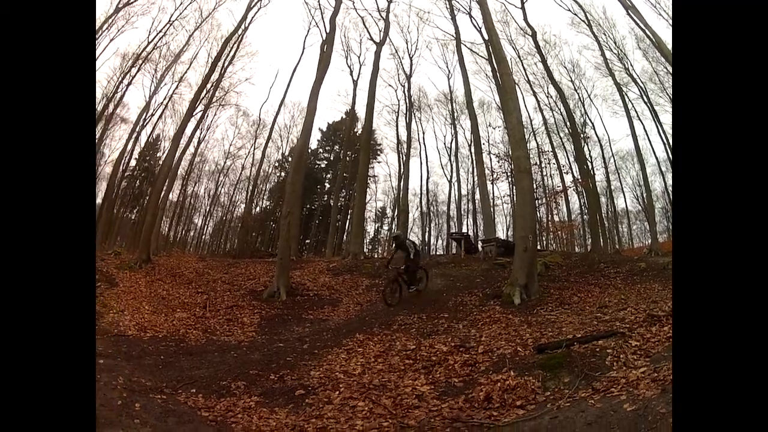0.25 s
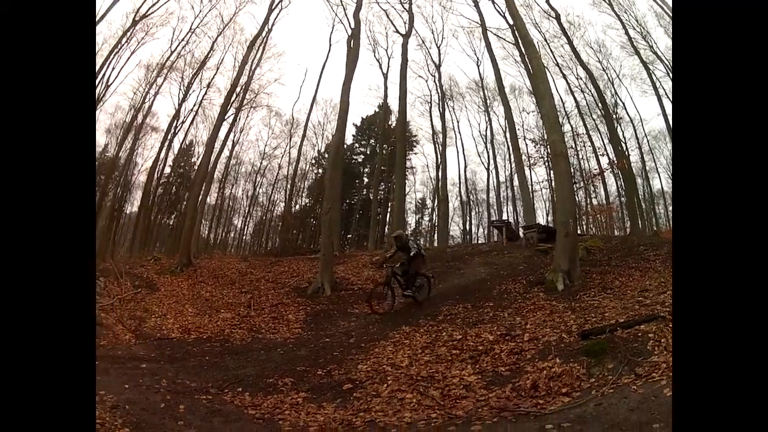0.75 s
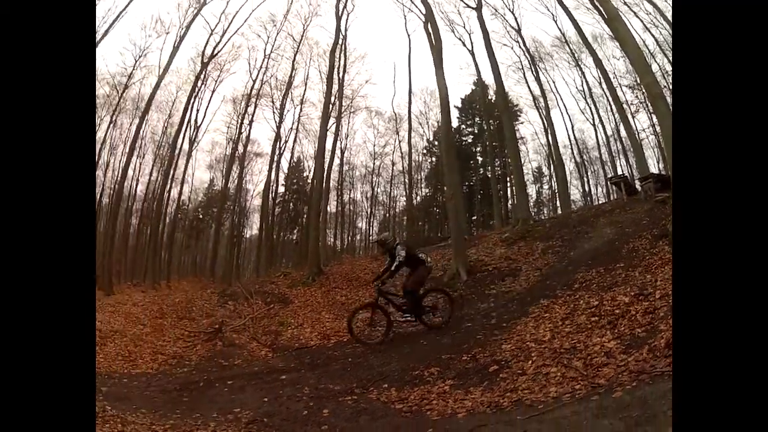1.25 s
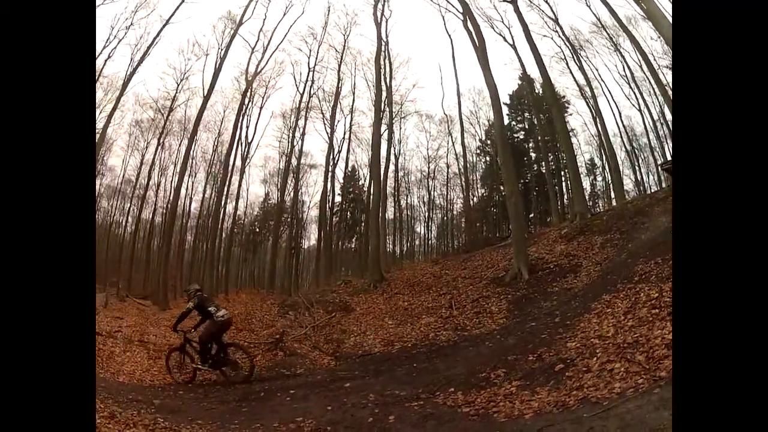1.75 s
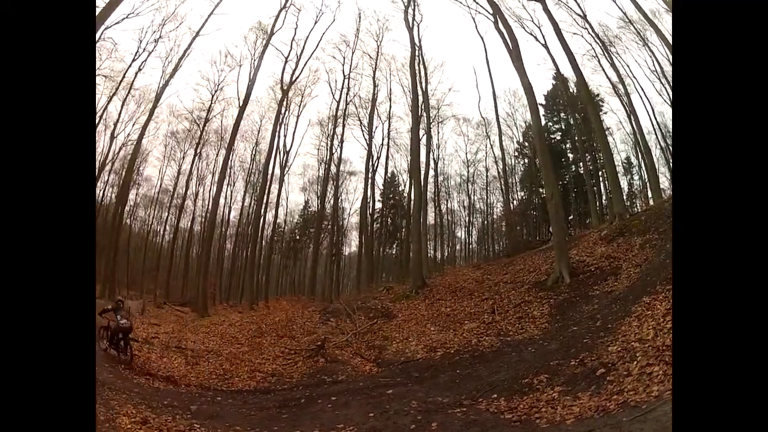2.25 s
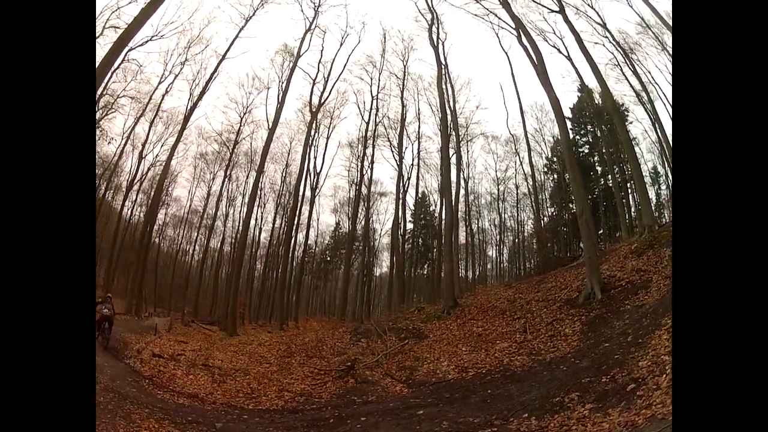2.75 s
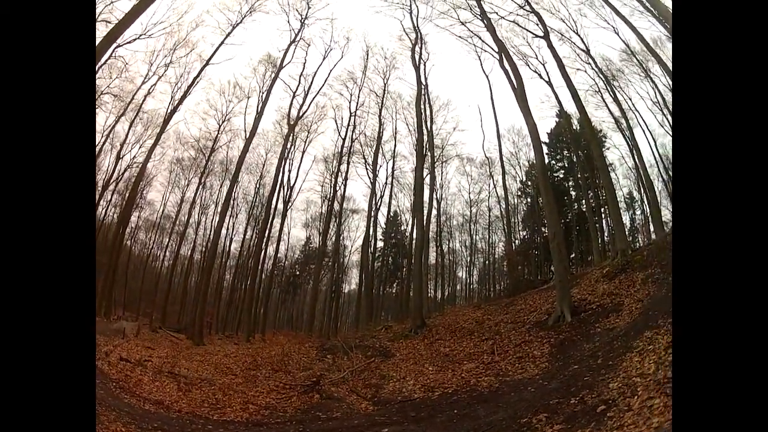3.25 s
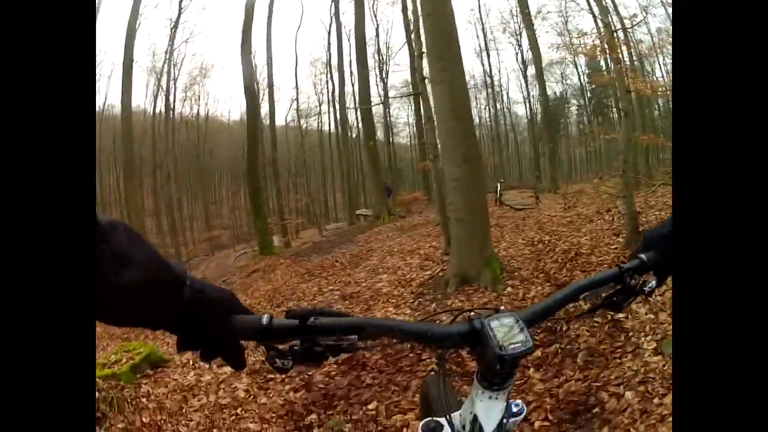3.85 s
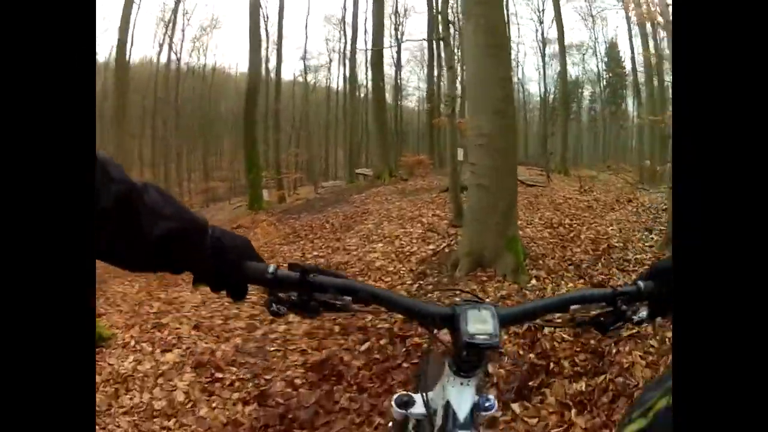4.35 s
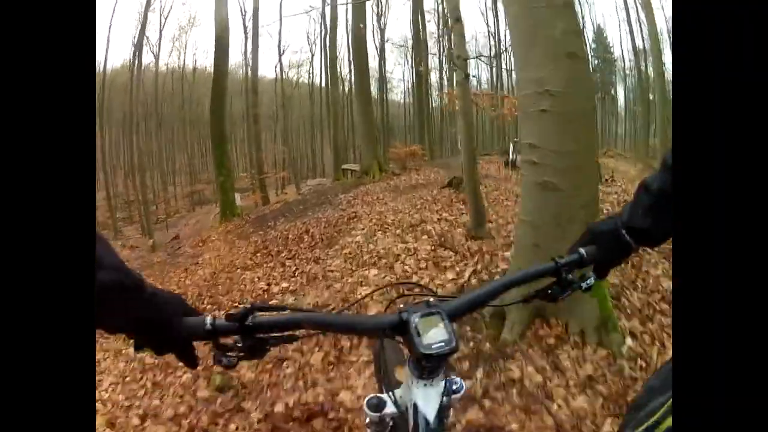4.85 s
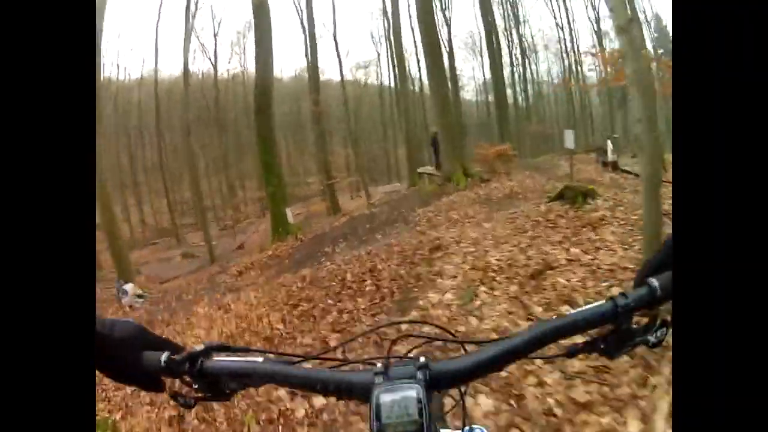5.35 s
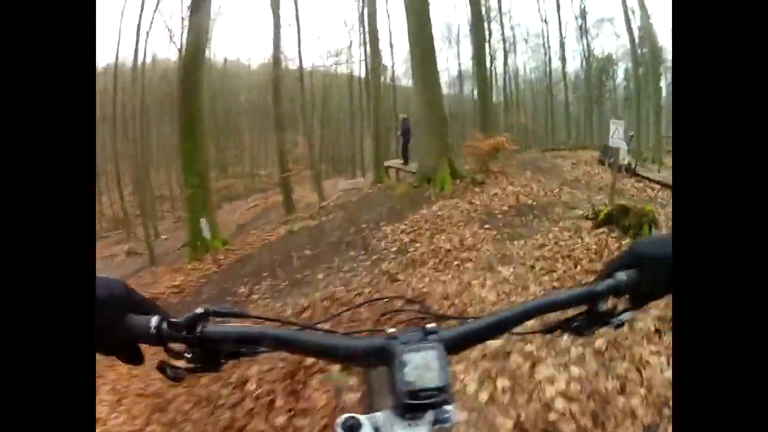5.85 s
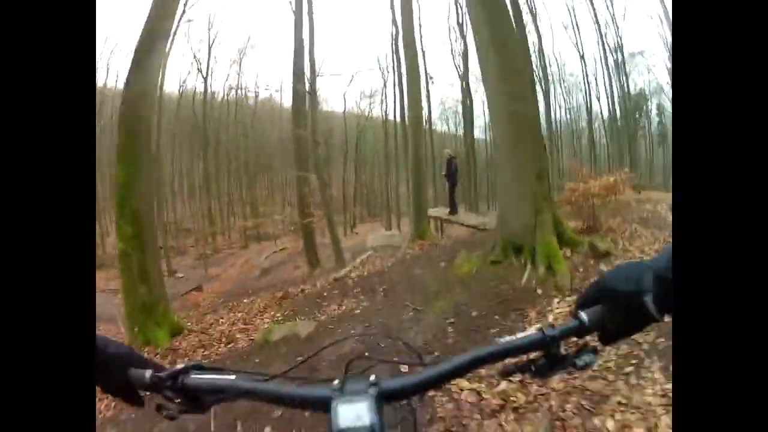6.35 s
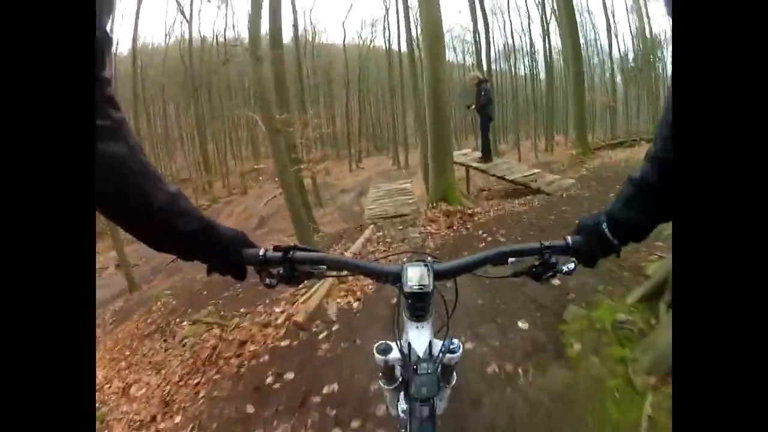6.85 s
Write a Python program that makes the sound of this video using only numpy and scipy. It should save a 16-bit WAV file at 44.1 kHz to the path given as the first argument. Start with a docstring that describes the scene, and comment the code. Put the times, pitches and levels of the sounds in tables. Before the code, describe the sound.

Bicycle tyres thud on soil and crunch dry leaves, first passing by, then close up with rattling bumps, snaps and buffeting air.

```python
"""A leafy forest trail: a mountain bike heard by an action camera in a closed housing. It rolls past, the
first second at a third of its speed; after a short gap we ride along at the rider's chest, speeding up.
Air and frame rumble, tyre knobs thud on soil and ring the housing, and dry leaves crackle. Bumps knock,
twigs snap, the drivetrain buzzes and a brake squeals once, over a far hum. The camera holds each sample
at a low rate, so the sound returns mirrored around that rate."""
import sys
import numpy as np
from scipy import signal
from scipy.fft import rfft, irfft, next_fast_len
from scipy.io import wavfile
from scipy.ndimage import uniform_filter1d, map_coordinates

SR = 44100
rng = np.random.default_rng(int(sys.argv[2]) if len(sys.argv) > 2 else 0)


def digitize_waveform(pressure):
    """Quantize a signal to 16-bit integers and store it at the path in sys.argv[1].

    Rows of a 2-D input are taken as channels; values are limited to [-1, 1].
    """
    field = np.atleast_2d(pressure).T
    bounded = np.clip(field, -1, 1)
    quanta = np.round(bounded * 32767).astype(np.int16)
    wavfile.write(sys.argv[1], SR, quanta)


N = 312933
TIME = np.arange(N) / SR

# Faders for the slow-motion pass: (time [s], rumble [dB], knobs [dB], leaves [dB])
SLOW_FADERS = [(0, -29.5, -69, -70), (.076, -48.5, -54, -66), (.083, -30, -45.5, -55.5),
               (.3, -48, -35.5, -45.5), (.5, -32.5, -38, -50.5), (1, -38.5, -44, -54)]
# Faders for the pass, then for the chest ride: (time [s], rumble [dB], knobs [dB], leaves [dB])
RIDE_FADERS = [
    [(1.0, -36.5, -46.5, -51.5), (1.15, -41, -40, -51.5), (1.36, -54, -38, -45.5), (1.7, -46, -44.5, -54),
     (2.07, -55, -38, -49.5), (2.25, -53, -44.5, -56.5), (2.46, -54.5, -50.5, -59.5),
     (3.0, -60, -49.5, -63.5), (3.52, -59, -56.5, -66.5)],
    [(3.56, -50, -58.5, -64.5), (4.03, -51.5, -49, -49), (4.5, -50, -40.5, -42), (5.05, -45, -44, -44),
     (5.5, -34.5, -39, -39.5), (5.8, -30.5, -45, -44.5), (6.1, -32, -43.5, -45), (6.38, -29, -37, -42.5),
     (6.5, -33, -48.5, -50), (6.7, -32, -42, -51), (7.1, -27.5, -42, -48)],
]
# Roots and leaf heaps: (start [s], length [s], knobs lift [dB], leaves lift [dB])
ROUGH_PATCHES = [(0.117, 0.024, 11.5, 5.5), (0.513, 0.035, 2.5, 6), (1.286, 0.071, 3.5, 3),
                 (1.424, 0.033, 2, 4), (1.575, .015, 2.5, 8), (1.651, 0.033, 9, 6.5),
                 (1.723, 0.0063, 2, 6.5), (1.794, 0.019, 3.5, 3.5), (2.56, 0.265, 5.5, -2.5),
                 (3.575, 0.1, 8.5, 6), (3.84, 0.054, 7, 4.5), (4.079, 0.083, 3, -0.5),
                 (4.635, 0.11, 1.5, -2.5), (5.115, 0.068, 7, 5.5), (5.262, 0.031, 3, 5),
                 (5.365, 0.077, 0.5, 2), (5.528, 0.1, -0.5, 2.5), (5.856, 0.12, 6.5, 6),
                 (6.197, 0.09, 3.5, 3), (6.705, 0.068, 3.5, 3), (6.858, 0.023, 7.5, 3.5),
                 (7.034, 0.005, -3.5, 2)]
def rolling(faders, housing, speed, thud_db, frame_db):
    """Tyres on the trail: the same jolts shake thud, housing and leaves, over the rumble."""
    rumble_db, knobs_db, leaves_db = curves(faders)
    lift_db = np.zeros(N)
    for start, length, knobs_lift_db, leaves_lift_db in ROUGH_PATCHES:
        patch = plateau(start, length, attack_s=0.0055, release_s=0.044)
        lift_db += knobs_lift_db * patch
        leaves_db += leaves_lift_db * patch
    swing_db = 0.26 * (knobs_db + 41.5)  # the thud swings wider than the knobs' fader
    tyre_gain = amp(knobs_db + thud_db + swing_db + 0.8 * lift_db)
    thud_gain = np.hypot(tyre_gain, amp(rumble_db + frame_db))  # the shaking frame adds weight
    rumble = amp(rumble_db) * air_rumble(speed)
    jolts = wobble(25 * speed)
    thud = thud_gain * tyre_thud(jolts, speed)
    ring = amp(knobs_db + lift_db) * housing_ring(housing, jolts, speed)
    leaves = amp(leaves_db) * leaf_crackle(jolts, speed)
    return rumble + thud + ring + leaves


# Rumble EQ at full speed: (frequency [Hz], relative level [dB])
RUMBLE_EQ = [(12, -41), (22, -9.5), (40, 2.5), (80, 0.5), (130, -1.5), (250, -13.5), (660, -120)]
def air_rumble(speed):
    """Buffeting air and frame: deep noise, squeezed so that the pushes are of rather even size."""
    hz, db = np.transpose(RUMBLE_EQ)
    eq = lambda f: amp(np.interp(np.log(f / speed), np.log(hz), db))
    noise = unit(filtered(rng.standard_normal(N), eq))
    envelope = np.abs(signal.hilbert(noise, next_fast_len(N))[:N])
    return unit(noise / (0.37 + envelope) ** 0.27)


# Tyre and frame modes at full speed: (frequency [Hz], width [Hz], gain [dB])
TYRE_MODES = [(154, 150, -5), (251, 107, 1.5), (389, 163, -2)]
def tyre_thud(jolts, speed):
    """Knobs striking soil: a muffled patter through tyre and frame."""
    hits = grains(350 * speed, spread_db=4.6, clump_db=1.8, clump_hz=35 * speed, bed=1.52)
    muffled = lambda f: modes(TYRE_MODES, speed)(f) / (1 + 1j * f / (600 * speed)) ** 2
    return unit(filtered(hits * amp(1.75 * jolts), muffled))


# Low housing modes for each playing speed, before retuning: (frequency [Hz], width [Hz], gain [dB])
RIDE_HOUSING = [(687, 600, 0), (918, 450, -4)]
SLOW_HOUSING = [(814, 194, 2.5), (929, 173, -3.5)]
def housing_ring(housing, jolts, speed):
    """Knob hits ring the closed housing: a boxy midrange."""
    hits = grains(400 * speed, spread_db=3.1, clump_db=1.57, clump_hz=50 * speed, bed=1.0)
    boxy = lambda f: modes(housing, speed)(f) * modes([(780, 450, 0)], speed)(f)
    return unit(filtered(hits * amp(2.3 * jolts), boxy))


# High housing modes, before retuning: (frequency [Hz], width [Hz], gain [dB])
HIGH_MODES = [(2160, 850, -6.5), (2950, 346, 2), (4220, 914, -5.5), (5080, 510, -30)]
def leaf_crackle(jolts, speed):
    """Dry leaves crushed under the tyres: fine crunch coloured by the housing."""
    cracks = grains(900 * speed, spread_db=4.0, clump_db=1.9, clump_hz=55 * speed, bed=1.0)
    return unit(filtered(cracks * amp(0.84 * jolts), modes(HIGH_MODES, speed)))


# Soft tyre and frame thumps: (time [s], level [dB], pitch [Hz])
FRAME_THUMPS = [(.127, -27.5, 60.4), (.3, -25, 100.5), (.395, -23, 105), (.56, -27, 274), (1.3, -20, 300),
                (1.316, -16.5, 427), (1.322, -15.5, 387), (1.583, -21, 106), (2.132, -25.5, 202),
                (2.712, -27, 290), (3.575, -33, 250), (3.648, -31.5, 292), (4.084, -20.5, 138),
                (4.131, -24.5, 358), (4.534, -14.5, 388), (4.697, -22.5, 328), (5.088, -22, 81.5),
                (5.594, -16, 241), (5.898, -11.5, 250), (6.057, -16, 86), (6.132, -15.5, 89),
                (6.231, -16.5, 357), (6.589, -18, 84), (6.642, -19.5, 135), (6.83, -16, 187)]
# Bumps rapping the housing, and at 0.52 s a twig tick heard at a third of its speed: (time [s], level [dB],
# pitch [Hz])
HOUSING_KNOCKS = [(0.52, -33, 1160), (0.997, -27.5, 910), (1.227, -28.5, 780), (1.316, -25, 807),
                  (1.48, -28, 880), (1.643, -26, 723), (1.998, -28.5, 810), (2.132, -29.5, 740),
                  (2.562, -30.5, 755), (2.706, -34.5, 775), (2.716, -30, 697), (2.764, -33.5, 820),
                  (2.777, -37, 760), (2.819, -36, 720), (2.904, -39.5, 710), (3.107, -36, 653),
                  (3.298, -41.5, 730), (3.649, -31, 660), (4.131, -31.5, 720), (4.331, -29.5, 610),
                  (4.535, -22.5, 680), (4.698, -27, 710), (5.084, -30, 740), (5.169, -24, 810),
                  (5.189, -28, 765), (5.413, -27, 656), (5.483, -28, 610), (5.607, -25, 685),
                  (5.912, -36.5, 764), (6.23, -60, 674), (6.247, -18, 716), (6.308, -26, 820),
                  (6.363, -24.5, 670), (6.707, -30.5, 670), (6.96, -34.5, 675)]
def bumps(table, t60_cycles, rise_cycles, rough):
    """Each blow rings at its own pitch and dies; rough adds a scatter of rebounds."""
    track = np.zeros(N + SR)
    t = np.arange(SR // 10) / SR
    for start, db, hz in table:
        cycles = t * hz
        envelope = amp(-60 * cycles / t60_cycles) * (1 - np.exp(-cycles / rise_cycles))
        span = round(SR / hz / 3)
        noise = rng.standard_normal(len(t))
        rebounds = unit(uniform_filter1d(uniform_filter1d(noise, span), span))
        ring = np.sin(2 * np.pi * cycles) + rough * rebounds
        track[round(start * SR):][:len(t)] += amp(db) * envelope / envelope.max() * ring
    return track[:N]


# Twig snaps and chain ticks: (time [s], strength [dB], bright layer offset [dB])
SNAP_CUES = [(0.524, -16, 10), (1, -34, -2.5), (1.0156, -21, -14), (1.316, -19.5, 8), (1.48, -17.5, -16),
             (1.584, -18, -8), (1.641, -12, 4.5), (1.7083, -22.5, 0.5), (1.737, -19.5, 9.5),
             (2.3686, -31, 6), (3.6502, -28.5, -1), (3.8545, -38, 18), (4.333, -21, 6.5), (4.46, -18, 2.5),
             (4.5702, -19.5, 4), (4.765, -27, -33), (4.8703, -19.5, 1), (4.925, -19, -19),
             (4.942, -20, -2.5), (5.1177, -21, 0), (5.139, -23, 13), (5.1683, -14.5, 5),
             (5.1928, -14.5, 0.5), (5.218, -21, -0.5), (5.2636, -15, -5), (5.3896, -19.5, 10),
             (5.4135, -11.5, 2.5), (5.4941, -13.5, 1), (5.5622, -14, 4), (5.699, -17.5, -1.5),
             (5.8722, -13.5, -2), (5.899, -16, -9), (6.1042, -12, -2.5), (6.1418, -14.5, 1),
             (6.3507, -18, 2.5), (6.4282, -17.5, -6), (6.5748, -20.5, -11), (6.6468, -20.5, -10),
             (6.6985, -23.5, -7.5), (6.7215, -14, -13), (6.745, -22, -7), (6.87, -15, 1),
             (7.0298, -14.5, -1)]
def snaps():
    """A sharp crack and a dying burst of tiny ones, ringing the housing's high modes."""
    t = np.arange(SR // 10) / SR
    tail_t60_s, crack_t60_s, rise_s = 0.025, 0.0023, 0.00015
    decay = amp(-60 * t / tail_t60_s) + amp(2.5 - 60 * t / crack_t60_s)
    envelope = decay * (1 - np.exp(-t / rise_s))
    dull, bright = np.zeros((2, N + SR))
    for start, db, bright_db in SNAP_CUES:
        noise = rng.standard_normal(len(t))
        burst = amp(db) * envelope * np.sign(noise) * np.abs(noise) ** 0.5
        dull[round(start * SR):][:len(t)] += burst
        bright[round(start * SR):][:len(t)] += burst * amp(bright_db)
    body = filtered(dull[:N], modes(HIGH_MODES[:2], tuning=0.99))
    return body + filtered(bright[:N], modes(HIGH_MODES[2:], tuning=0.86))


# The passing bike coasts: (start [s], length [s], level [dB])
COAST_CUES = [(0.997, 0.48, -65), (1.824, 0.37, -50.5), (2.567, 0.15, -55.5)]
# Drivetrain modes, before retuning: (frequency [Hz], width [Hz], gain [dB])
CHAIN_MODES = [(1800, 180, 6.2), (3830, 190, 6.9)]
def drivetrain_buzz():
    """Dense, tiny chain and pawl clicks ringing two modes."""
    gain = sum(amp(db) * plateau(start, length, attack_s=0.04, release_s=0.19)
               for start, length, db in COAST_CUES)
    clicks = grains(990, spread_db=3.0, clump_db=3.7, clump_hz=60, bed=0.63)
    return gain * unit(filtered(clicks, modes(CHAIN_MODES, tuning=0.99)))


# Squeal faders: (time [s], lower partial [dB], upper partial [dB])
SQUEAL_FADERS = [(6.21, -66, -63), (6.3, -55, -49.5), (6.4, -53, -56), (6.42, -55, -48), (6.44, -70, -77)]
def brake_squeal():
    """A brake sings briefly on two partials: it swells, holds and stops."""
    return tone(SQUEAL_FADERS, partials_hz=(3513, 5270), waver_db=1.5)


# Hum faders: (time [s], note [dB], octave [dB])
HUM_FADERS = [(1.0, -42, -48), (1.55, -45.5, -48.5), (2.22, -52, -47), (2.47, -57, -42.5),
              (2.54, -47.5, -58), (2.86, -54.5, -60), (3.0, -66, -57), (3.25, -55.5, -70), (3.52, -53, -48)]
def far_hum():
    """A distant hum whose weight moves between a note and its slightly sharp octave."""
    return tone(HUM_FADERS, partials_hz=(105.3, 215.5), waver_db=0.59)


def microphone_hiss():
    """The microphone's own white noise."""
    return amp(-60.5) * rng.standard_normal(N)


def amp(db):
    return 10 ** (np.asarray(db) / 20)


def unit(x):
    return x / np.sqrt(np.mean(x ** 2) + 1e-20)


def curves(faders):
    """One value per sample for each column after the time."""
    times, *columns = np.transpose(faders)
    return [np.interp(TIME, times, column) for column in columns]


def plateau(start, length, attack_s, release_s):
    """Fade up to 1 by the start, hold for the length, fade out."""
    return np.interp(TIME, np.cumsum([start - attack_s, attack_s, length, release_s]), [0, 1, 1, 0])


def wobble(rate):
    """A smooth random curve, rate knots a second."""
    return map_coordinates(rng.standard_normal(int(N * rate / SR) + 4), [TIME * rate])


def filtered(x, response):
    """x through a complex frequency response."""
    size = next_fast_len(N + SR // 2)
    hz = np.fft.rfftfreq(size, 1 / SR) + 1e-3
    return irfft(rfft(x, size) * response(hz), size)[..., :N]


def modes(table, tuning):
    """A resonator bank of alternating polarity; tuning scales frequencies and widths."""
    def resonance(f, hz, width):
        return 1j * f * width / (hz ** 2 - f ** 2 + 1j * f * width)
    return lambda f: sum((-1) ** k * amp(db) * resonance(f / tuning, hz, width)
                         for k, (hz, width, db) in enumerate(table))


def grains(per_s, spread_db, clump_db, clump_hz, bed):
    """Scattered impulses of uneven size over a noise bed, swelling in clumps."""
    hits = (rng.random(N) < per_s / SR) * amp(spread_db * rng.exponential(size=N))
    hits = np.clip(hits * rng.choice([-1, 1], N), -amp(4.9 * spread_db), amp(2.0 * spread_db))
    return (unit(hits) + bed * rng.standard_normal(N)) * amp(clump_db * wobble(clump_hz))


def tone(faders, partials_hz, waver_db):
    """Sines of wavering level, silent outside their faders' span."""
    gate = uniform_filter1d(1. * ((TIME > faders[0][0]) & (TIME < faders[-1][0])), size=400)
    partials = (amp(db + waver_db * wobble(40)) * np.sin(2 * np.pi * hz * TIME)
                for hz, db in zip(partials_hz, curves(faders)))
    return gate * np.sqrt(2) * sum(partials)


def slow_then_normal(slow, normal, switch_s=1.0):
    """A quick crossfade out of slow motion."""
    late = uniform_filter1d(1. * (TIME > switch_s), size=200)
    return (1 - late) * slow + late * normal


def sample_hold(x, speed):
    """The camera's held samples: the band under half the rate, plus mirrors with a null at the rate."""
    rate_hz, edge_hz = 12000 * speed, 15180 * speed
    base = filtered(x, lambda f: 1 / (1 + (f / (0.47 * rate_hz)) ** 24))
    mirrors = base * 2 * np.cos(2 * np.pi * rate_hz * TIME)
    edge = lambda f: 1 / (1 + (f / edge_hz) ** 240)
    droop = lambda f: np.abs(rate_hz - f) / f * (f / rate_hz) ** 0.21
    return base + amp(1.12) * filtered(mirrors, lambda f: (f > rate_hz / 2) * droop(f) * edge(f))


def scene():
    """Mono mix: the rolling bed, slowed and then normal, with hits, tones and hiss on top."""
    slow = rolling(SLOW_FADERS, SLOW_HOUSING, speed=1 / 3, thud_db=2, frame_db=-33)
    normal = rolling(np.vstack(RIDE_FADERS), RIDE_HOUSING, speed=0.97, thud_db=1, frame_db=-5.5)
    bike = slow_then_normal(slow, normal + drivetrain_buzz())
    thumps = bumps(FRAME_THUMPS, t60_cycles=7.3, rise_cycles=0.15, rough=0.28)
    knocks = bumps(HOUSING_KNOCKS, t60_cycles=23, rise_cycles=1.1, rough=0.51)
    return (bike + thumps + knocks + snaps() + brake_squeal() + far_hum() + microphone_hiss())[None]


def record(dry):
    """The camera's colour: sample-and-hold grit, a silent gap between the rides and a hard top cut."""
    gap_start_s, gap_end_s, top_hz = 3.527, 3.553, 16650
    gate = uniform_filter1d(1. * ((TIME < gap_start_s) | (TIME > gap_end_s)), size=100)
    held = slow_then_normal(sample_hold(dry, speed=1 / 3), sample_hold(dry, speed=1))
    return filtered(gate * held, lambda hz: hz < top_hz)


dry = scene()
out = record(dry)
digitize_waveform(out)
```